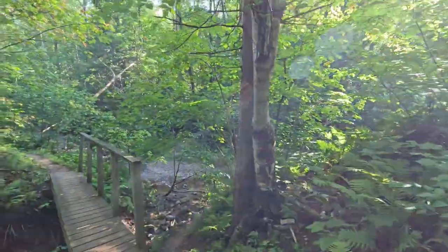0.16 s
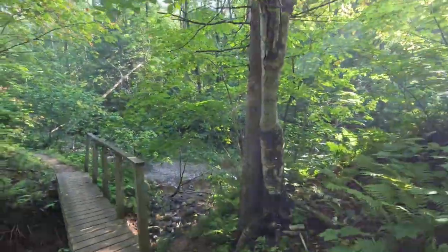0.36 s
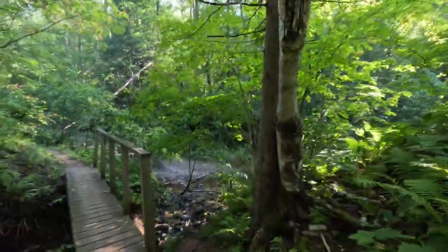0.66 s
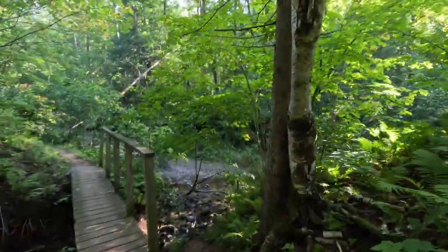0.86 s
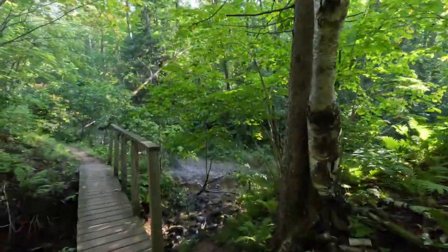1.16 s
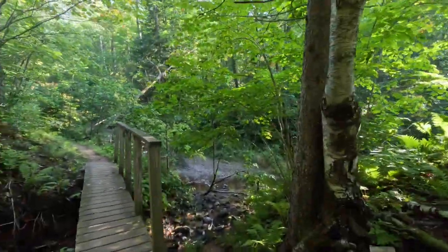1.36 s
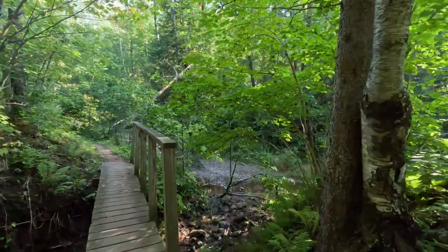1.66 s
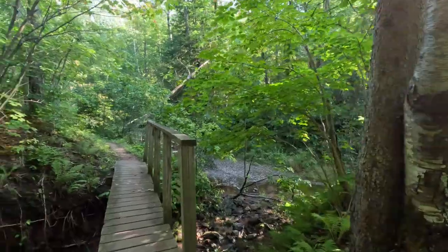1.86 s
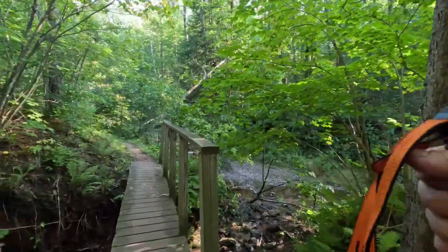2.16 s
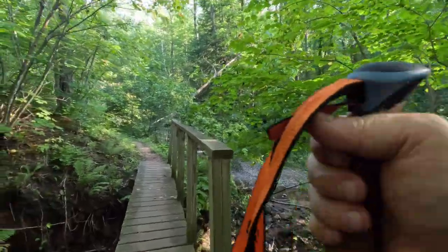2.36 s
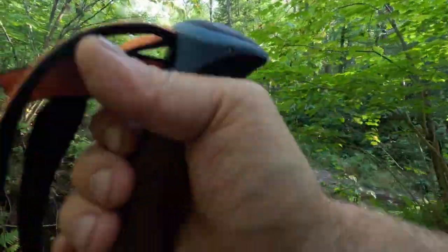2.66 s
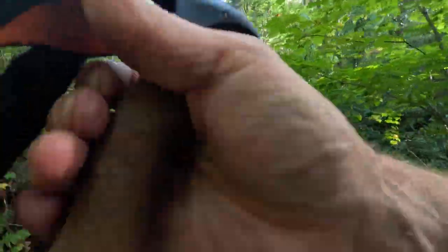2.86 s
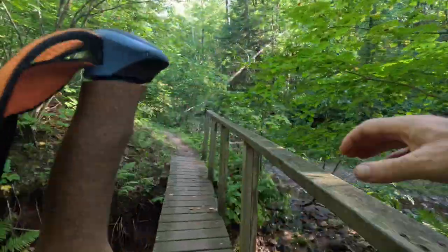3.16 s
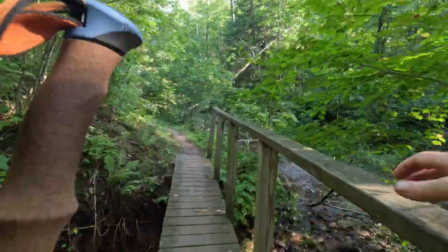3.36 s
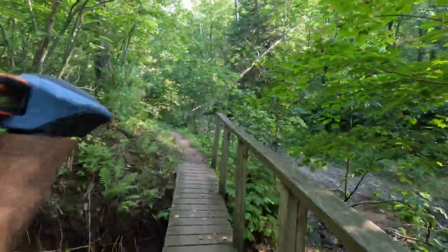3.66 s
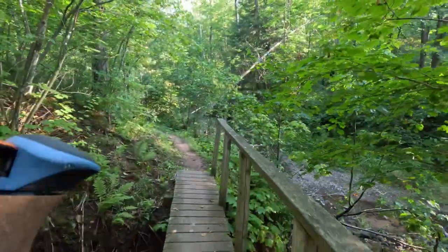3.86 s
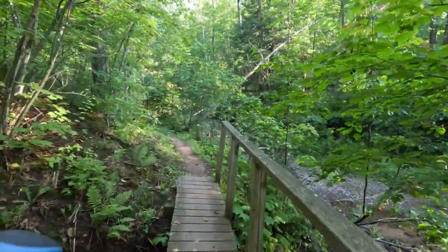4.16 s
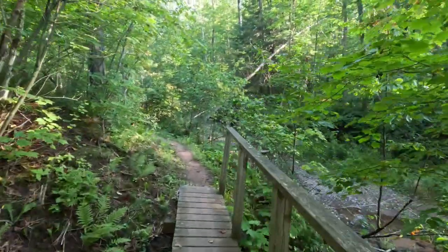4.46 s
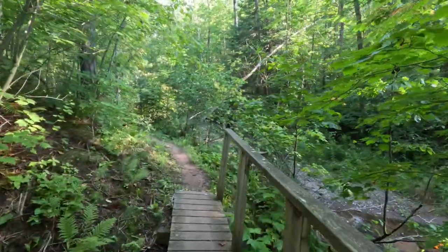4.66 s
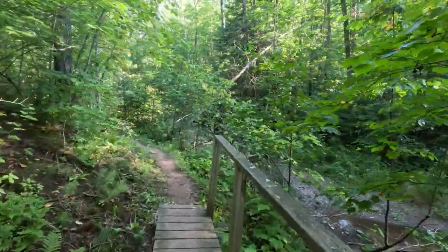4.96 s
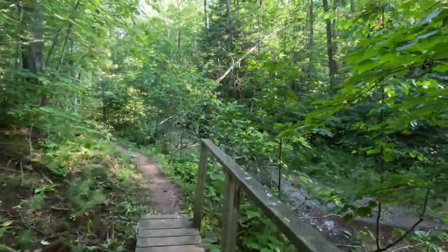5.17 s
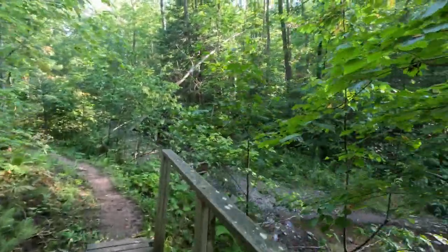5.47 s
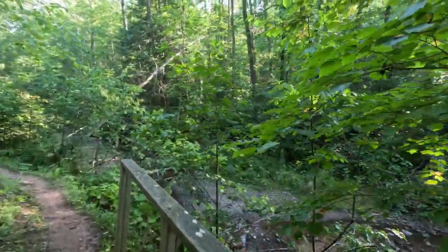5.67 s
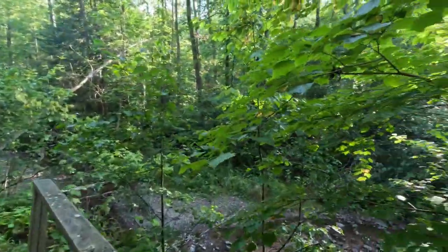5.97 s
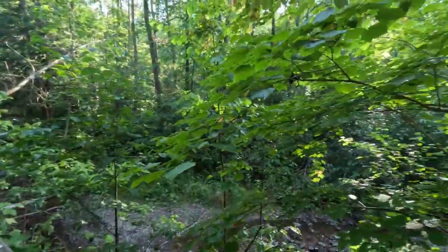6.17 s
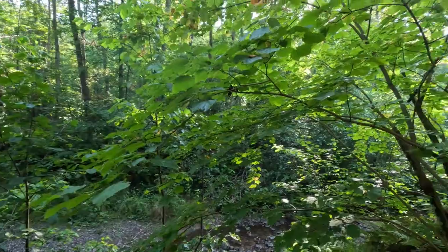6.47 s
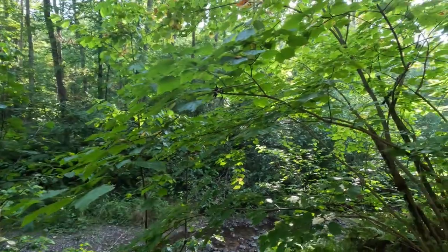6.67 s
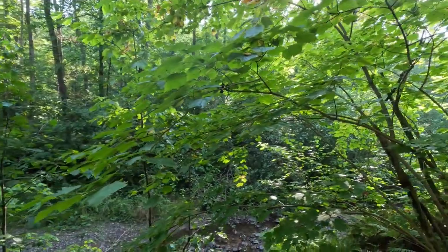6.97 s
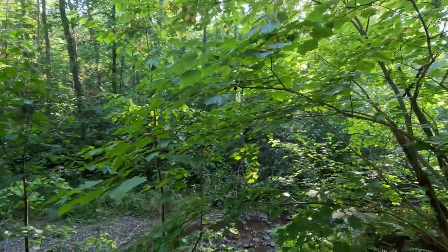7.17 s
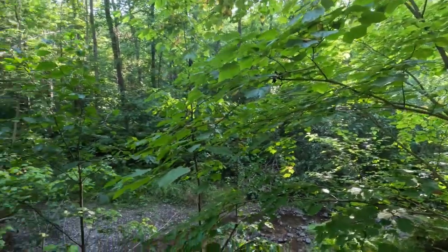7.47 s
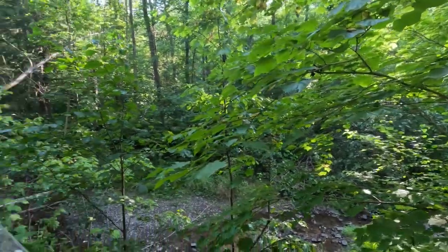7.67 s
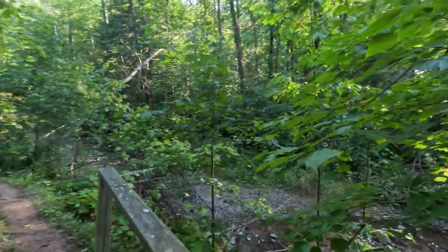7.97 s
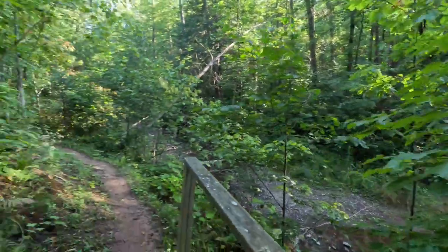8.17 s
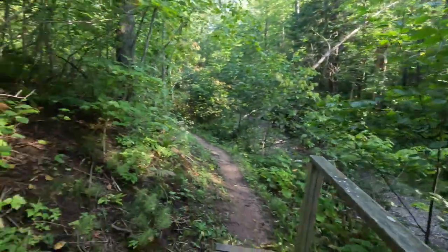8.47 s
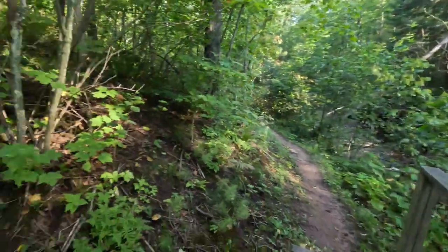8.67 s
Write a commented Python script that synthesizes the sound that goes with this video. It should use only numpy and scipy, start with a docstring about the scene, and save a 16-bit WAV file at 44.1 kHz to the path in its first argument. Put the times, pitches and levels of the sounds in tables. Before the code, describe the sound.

Heard from the walker's body, boots thud on a gritty path, then step onto a wooden footbridge with hollow booms and sharp pole knocks, loudest at about three and a half seconds. Clothes swish and low jolts accompany the steps. Later the footfalls thin out, leaving a small creek hissing and gurgling, with a few scrapes and last soft steps.

```python
"""Boots and trekking poles come down a forest path and over a wooden footbridge, heard from the walker's body.
Soft blows ring low modes for the thuds and booms; sharp ones ring plank modes for the knocks of heels and poles.
Uneven slips scrape over the wood, clumps of tiny snaps make grit crunch, and shaped noise makes clothes swish.
Footfalls and shifts of the body jolt the microphone with a low rumble. Behind it all a small creek hisses,
gurgles and sprays: shaped noise with small splashes, and many short, ringing bubbles."""
import sys
import numpy as np
from scipy import signal
from scipy.fft import rfft, irfft
from scipy.io import wavfile
from scipy.ndimage import uniform_filter1d

SR = 44100
rng = np.random.default_rng(int(sys.argv[2]) if len(sys.argv) > 2 else 0)


def transcribe(signal):
    """Save signal, clipped to [-1, 1], as a 16-bit WAV file at the path in sys.argv[1]."""
    frames = np.atleast_2d(signal).T
    limited = np.clip(frames, -1, 1)
    pcm = np.round(limited * 32767).astype(np.int16)
    wavfile.write(sys.argv[1], SR, pcm)


N = 389050
TIME = np.arange(N) / SR  # seconds


def amp(db):
    """Turns decibels into a gain."""
    return 10 ** (np.asarray(db) / 20)


def evened(x):
    """Scales a sound to an average (rms) level of 1."""
    return x / np.sqrt(np.mean(x ** 2) + 1e-20)


def unit_blow(x):
    """Scales a blow to the energy of 20 ms at rms 1."""
    return x / np.sqrt(np.sum(x ** 2) / (.02 * SR) + 1e-20)


def read(points, hz):
    """Reads a curve between its points, along a log-frequency axis."""
    point_hz, value = np.transpose(points)
    return np.interp(np.log(hz + 1), np.log(point_hz + 1), value)


def level(rows, axis=1):
    """Turns one dB column of a curve over time into a gain for every sample."""
    rows = np.array(rows)
    return amp(np.interp(TIME, rows[:, 0], rows[:, axis]))


def panned(x, db):
    """Places a sound between left and right; positive dB makes the left louder."""
    return amp([[db / 2], [-db / 2]]) * x


def add(mix, s, sound):
    """Mixes a sound in at time s, cut off at the end of the mix."""
    part = mix[:, max(round(s * SR), 0):][:, :sound.shape[-1]]
    part += sound[..., :part.shape[1]]


def band(x, lo_hz, hi_hz, order=3):
    """Keeps the frequencies between two limits."""
    limits = [lo_hz, min(hi_hz, .48 * SR)]
    return signal.sosfilt(signal.butter(order, limits, "band", fs=SR, output="sos"), x)


def ring(modes, t, stretch, uneven_db, detune):
    """Rings the dying modes of wood, each with a slightly random strength, pitch and sign."""
    hz, db, t60 = np.transpose(modes)[:, :, None]
    weight, shift, side = rng.standard_normal((3, len(modes), 1))
    fade = amp(db + uneven_db * weight - 60 * t / (t60 * stretch))
    return np.sign(side) * fade * np.sin(2 * np.pi * hz * (1 + detune * shift) * t)


def load_curve(s, hold_s, rise_s, fall_db_per_s):
    """Follows the load of one step or shift: it builds up to time s, holds, and dies away."""
    early = np.maximum(s - TIME, 0)
    late = np.maximum(TIME - s - hold_s, 0)
    return np.exp(-early / rise_s) * amp(-fall_db_per_s * late)


# The weight of a boot or pole coming down. Each row: start in seconds, level in dB,
# pitch of the spot that is hit in Hz, and a factor on the ring time.
WEIGHT_BLOWS = [(.024, -34.5, 174, 0.36), (.709, -33, 190, 0.1), (0.849, -47, 235, 0.74),
                (1.261, -34, 162, 1), (1.82, -34.5, 228, 0.64), (1.869, -43.5, 264, 0.37),
                (2.007, -49.5, 140, 1), (2.333, -28.5, 234, 0.81), (2.348, -24, 177.5, 1),
                (2.362, -30.5, 210, 0.72), (2.849, -47, 262, 0.84), (2.93, -29.5, 248, 1),
                (2.958, -37, 187, .45), (3.055, -46, 184, 0.077), (3.287, -41, 382, 0.92),
                (3.367, -31, 220, 0.64), (3.526, -19.5, 304, 0.83), (3.533, -20.5, 217, 0.66),
                (3.54, -30, 420, 0.85), (3.55, -39, 126, 1), (4.276, -44, 275, 0.61), (4.3, -39, 212, 1),
                (4.688, -45, 378, 0.63), (4.801, -42.5, 240, 1), (4.849, -35.5, 263, 1),
                (4.87, -31, 223, 0.9), (4.884, -32.5, 245, 0.94), (4.935, -42, 179, .45),
                (5.312, -42.5, 216, 1), (5.356, -37.5, 254, 1), (5.385, -37.5, 247, 1),
                (5.418, -43, 210, 1), (5.622, -42.5, 357, 0.98), (5.814, -43.5, 225, 1),
                (5.84, -33, 215, 1), (5.877, -44, 215, 1), (6.295, -45.5, 215, 1), (6.591, -51.5, 235, 1),
                (8.171, -46, 243, 1), (8.517, -40.5, 294, 0.56), (8.796, -36, 206, 0.96)]
# Low modes of the ground, tuned as a bridge deck. Each row: pitch in Hz, relative strength in dB,
# and seconds to fade by 60 dB before each sound stretches or shortens it.
LOW_MODES = [(141.6, -7.5, 0.6), (175, 2, 0.12), (206, 0, 0.021), (211, -1.5, 0.19), (237, -11.5, 0.2),
             (275.3, -9, 0.24), (320.3, -7, 0.12), (377, 1, 0.061), (536, 8.5, 0.037)]


def thumps():
    """A soft blow drives the spot under the boot; low modes near its pitch ring on, for path and deck alike."""
    out, t = np.zeros((2, N)), np.arange(SR // 3) / SR
    mode_hz, mode_db, mode_t60 = np.transpose(LOW_MODES)[:, :, None]
    for s, db, hz, stretch in WEIGHT_BLOWS:
        spot = np.sin(2 * np.pi * hz * t) * amp(-60 * t / (0.072 * stretch))
        near = np.exp(-(np.log2(mode_hz / hz) / 0.44) ** 2)  # distance in octaves
        fade = amp(mode_db - 60 * t / (mode_t60 * stretch))
        ground = (near * fade * np.sin(2 * np.pi * mode_hz * t)).sum(0)
        tread = band(rng.standard_normal(len(t)), hz * .72, hz * 1.7, order=2) * amp(-60 * t / .04)
        blow = unit_blow(spot) + amp(-4.5) * unit_blow(ground) + amp(-5.0) * unit_blow(tread)
        # the rubber sole spreads the push over a few milliseconds
        push = 1 - np.exp(-t / (0.0048 * stretch ** 2))
        blow = band(blow * push, hz * 0.3, hz * 4.3, order=2)
        add(out, s, -amp(db) * unit_blow(blow))
    return out


# Hard contacts of heel, toe and pole, and the click of a strap at 3.0078 s. Each row: start in seconds,
# level in dB, weight behind the blow in dB, hardness in dB, pitch of the spot in Hz,
# seconds for the rattle to fade by 60 dB, and left over right in dB.
HARD_CONTACTS = [(0.0241, -50, -7, -9, 1100, 0.017, 2), (0.0489, -35.5, -23, -7.5, 2270, 0.037, 7),
                 (.072, -47.5, -25, -3.5, 1390, .079, 6), (0.135, -53, -29, -6, 1830, 0.038, 9),
                 (.706, -42, -4, -9, 1040, 0.083, 4), (0.755, -53.5, -4, -17, 1480, 0.1, 6),
                 (1.263, -41, -11, -11, 1220, .052, 3), (1.321, -50.5, -14, -1, 1600, 0.24, 6),
                 (1.822, -47.5, -7, -9, 1220, 0.087, 3), (1.864, -50, -15, -2.5, 1240, .05, 3),
                 (1.894, -48, -15, -8, 1180, 0.18, 4), (2.3334, -37.5, 1, -17, 1620, 0.014, 2),
                 (2.354, -43, -7, -14, 990, 0.036, -1), (2.369, -36.5, -8, -16, 1940, 0.036, 2),
                 (2.8491, -40.5, -8, -1.5, 1350, 0.06, 0.5), (2.886, -49, -15, -1.5, 1530, 0.059, 2),
                 (3.0078, -50, -15, 5, 1670, 0.032, -2), (3.288, -31.5, -11, -7, 1330, 0.029, 2),
                 (3.3001, -33.5, -10, -15, 1300, 0.019, 1), (3.307, -30, -4.5, -14.5, 887, 0.08, 0.5),
                 (3.348, -37.5, -7, -26, 1090, 0.045, 1), (3.367, -22.5, -19, -4, 1460, 0.034, 4),
                 (3.4963, -32.5, -4, -19, 910, 0.073, -0.5), (3.5189, -26.5, -4, -18, 1190, 0.069, 2.5),
                 (3.538, -40, -21, -15, 1250, 0.088, 1), (3.611, -41.5, -3.5, -15, 880, 0.042, 0),
                 (3.667, -43, -4, -4, 1290, 0.02, 1), (3.717, -44.5, -3, -26, 1040, 0.15, 0),
                 (4.686, -34, -16.5, -7.5, 1220, 0.025, 2.5), (4.797, -54, -8, -5, 1820, 0.018, 4),
                 (4.8701, -39, -5, -20, 1140, 0.024, 3.5), (4.931, -46.5, -6, -21, 1450, 0.19, 4),
                 (5.312, -44, -12, -7, 1690, 0.14, 3), (5.383, -50.5, -12, -18, 1440, .03, 2),
                 (5.493, -51, -4, -18, 1710, .017, 4), (5.6213, -30.5, -20, -9.5, 1370, 0.044, 1),
                 (5.717, -73.5, -17, 16, 1390, 0.049, 1), (5.816, -48, -14, -8.5, 1460, 0.063, 3),
                 (5.842, -49, -21, -23, 1250, .028, 1), (5.89, -51.5, -15, -9, 1830, 0.044, -2),
                 (7.238, -47, -12, -18, 1600, 0.04, 7), (8.4998, -46.5, 2.5, -22, 1340, 0.063, 3.5),
                 (8.523, -48, -12, -19, 1640, .05, 11), (8.796, -40, -11, -9, 1304, 0.44, 3.5)]
# The ways a single plank bends. Each row: pitch in Hz, relative strength in dB,
# and seconds to fade by 60 dB before each sound stretches or shortens it.
PLANK_MODES = [(376, -25.5, .2), (494, -25, .031), (684, -19, .054), (940, 0, .06), (982, -11, .08),
               (1204, 2, .033), (1303, -8, .07), (1620, -4, .06), (1810, 2, .055), (1835, 1, .047),
               (2194, 17, .0083), (2630, -3, .05), (2880, 5, .035), (3350, 7, .03), (5040, 2, .02),
               (5940, 2, .023)]
TICK_DB, TICK_PER_HARDNESS = -6, 1.59  # the topmost tick grows faster with hardness than the edge below it


def knocks():
    """Each contact mixes a sharp crack, the clack of the struck spot, plank modes and a short rattle."""
    out, t = np.zeros((2, N)), np.arange(SR // 6) / SR
    for s, level_db, weight_db, hard_db, hz, t60, pan_db in HARD_CONTACTS:
        wood = unit_blow(ring(PLANK_MODES, t, t60 / .035, uneven_db=1.5, detune=.015).sum(0))
        spot = unit_blow(np.sin(2 * np.pi * hz * t) * amp(-60 * t / (0.32 * t60)))
        grain = rng.standard_normal((3, len(t)))
        grain = grain[0] + amp(-13.5) * grain[1:]  # nearly the same noise on both sides
        crack = unit_blow(grain * np.exp(-t / 0.00096))
        rattle = unit_blow(grain * amp(-60 * t / t60))
        blow = amp(-4) * wood + amp(-6) * spot + amp(2) * crack + amp(6) * rattle
        # the heavy, low motion builds up last
        rise_s = np.array([0.007, 0.00038, 0.000032, 0.000035])
        swells = 1 - np.exp(-t / rise_s[:, None])
        # weight drives the low knock, hardness the edge and tick above the spot's own range
        levels = [weight_db, 0, hard_db, TICK_DB + TICK_PER_HARDNESS * hard_db]
        ranges = [(370, 760), (hz * 0.66, hz * 1.35), (2300, 4000), (4900, 9200)]
        colour = 0
        for db, swell, (lo, hi) in zip(levels, swells, ranges):
            colour = colour + amp(db) * np.sqrt(2) * unit_blow(band(blow * swell, lo, hi))
        add(out, s, amp(level_db) * panned(colour, pan_db))
    return out


# Soles or poles dragged over wood. Each row: start in seconds, length in seconds, level setting in dB, centre
# pitch in Hz, and left over right in dB.
DRAGS = [(4.204, 0.046, -35, 2050, 4), (5.305, 0.023, -41.5, 2110, 5),
         (6.242, 0.085, -35.5, 1750, 5), (6.543, 0.11, -51.5, 1770, 5),
         (8.038, 0.1, -52, 1450, 3), (8.17, 0.035, -44, 1440, 4.5)]


def scrapes():
    """Quick uneven slips excite plank and deck modes; the sound darkens as the slide goes on."""
    out, t = np.zeros((2, N)), np.arange(SR // 5) / SR
    for s, length, db, hz, pan_db in DRAGS:
        u = np.clip(t / length, 0, 1)  # progress of the slide
        unevenness = uniform_filter1d(rng.standard_normal(len(t)), 100)
        turns = np.cumsum(260 * (1 + 3.5 * unevenness)) / SR  # about 260 slips per second
        grip = .25 + np.exp(-(turns % 1) / .25)
        slips = grip * rng.standard_normal(len(t)) * abs(np.sin(np.pi * u ** 0.83)) ** 0.99
        plank_ring = ring(PLANK_MODES, t, 0.93, uneven_db=-2, detune=0.023).sum(0)
        wood = signal.fftconvolve(slips, plank_ring)[:len(t)]
        deck_ring = ring(LOW_MODES, t, .6, uneven_db=1, detune=.01).sum(0)
        deck = signal.fftconvolve(slips * u, deck_ring)[:len(t)]
        rub = evened(slips) + amp(-12) * evened(wood)
        # fade from a brighter band to a darker one
        sound = (1 - u) * band(rub, hz * 0.69, hz * 1.46) + u * band(rub, hz * 0.42, hz * 1.18)
        sound = evened(sound) + amp(-23.5) * evened(band(deck, 170, 443))
        sound += amp(-18.5) * evened(band(slips, 3370, 6700, order=3))
        add(out, s, panned(amp(db) * sound * np.sqrt(length / t[-1]), pan_db))
    return out


# Grit crushed under a sole. Each row: time of full load in seconds, level in dB, hold in seconds.
CRUSHED_GRIT = [(0.07, -58, 0.036), (0.687, -54, 0.1), (1.27, -57, 0.17), (1.823, -55, 0.11),
                (2.358, -50.5, 0.027), (3.6, -55, 0.1), (5.897, -52.5, 0.057), (8.173, -52, 0.022),
                (8.499, -48.5, 0.042)]
CRUNCH_RISE_S, CRUNCH_FALL_DB_PER_S = 0.0057, 200
GRAINS_PER_S, GRAIN_SPREAD_DB = 350, 6.5


def crunches():
    """Grains of many sizes snap in a clump as the weight comes onto them."""
    size = amp(GRAIN_SPREAD_DB * np.minimum(rng.exponential(1, N), 3))
    grains = rng.standard_normal(N) * (rng.random(N) < GRAINS_PER_S / SR) * size
    t = np.arange(SR // 100) / SR
    snap = rng.standard_normal(len(t)) * np.exp(-t / .001)
    grit = evened(band(signal.oaconvolve(grains, snap)[:N], 600, 3300))
    load = sum(amp(db) * load_curve(s, hold, CRUNCH_RISE_S, CRUNCH_FALL_DB_PER_S)
               for s, db, hold in CRUSHED_GRIT)
    return panned(load * grit, 5.5)


# Footfalls and shifts of the body shake the microphone and load the ground. Each row: time of full load
# in seconds, jolt level in dB, jolt hold in seconds, roll level in dB, roll hold in seconds.
BODY_LOADS = [(0.048, -35.5, 0.044, -61, 0.039), (0.701, -34, 0.12, -56, 0.25),
              (1.29, -27.5, 0.038, -54, .08), (1.845, -42, 0.2, -56.5, 0.33),
              (2.335, -41.5, 0.17, -44, 0.075), (2.861, -39.5, 0.17, -47, 0.13),
              (3.526, -36.5, 0.095, -47, 0.077), (4.251, -48.5, 0.26, -46.5, 0.087),
              (4.457, -42, 0.022, -61, 0.026), (4.796, -44, 0.18, -46, 0.11),
              (5.309, -40.5, 0.097, -47.5, .11), (5.83, -47.5, 0.22, -51.5, 0.15),
              (6.254, -56, 0.096, -47.5, 0.022), (6.579, -68, 0.055, -52.5, .05),
              (8.06, -70, .1, -54.5, 0.18), (8.504, -61, .05, -50.5, 0.04), (8.783, -49, .05, -46, .05)]
# Unrest between these loads. Each row: time in seconds, body sway in dB, shifting weight in dB.
BODY_UNREST = [(0, -52.5, -56.5), (1.2, -57, -66), (2.6, -58.5, -70.5), (3.25, -45.5, -52.5),
               (4, -58.5, -64), (5.2, -56, -77.5), (6.8, -67, -67), (7.3, -56, -69), (7.8, -69, -69),
               (8.4, -52, -73), (8.82, -68, -70)]
ROLL_RISE_S, ROLL_FALL_DB_PER_S = 0.01, 133


def rolling():
    """Small uneven shifts of weight keep low modes murmuring during each footfall or shift of the body."""
    t = np.arange(SR // 4) / SR
    shifts = rng.standard_normal(N) * (rng.random(N) < 260 / SR)  # about 260 per second
    low_ring = ring(LOW_MODES, t, .5, uneven_db=1, detune=.01).sum(0)
    murmur = band(signal.oaconvolve(shifts, low_ring)[:N], 165, 370, order=2)
    load = sum(amp(db) * load_curve(s, hold, ROLL_RISE_S, ROLL_FALL_DB_PER_S)
               for s, _, _, db, hold in BODY_LOADS)
    return np.hypot(load, level(BODY_UNREST, axis=2)) * evened(murmur)


# How alike left and right are. Each row: frequency in Hz, likeness from 0 (unrelated) to 1 (the same).
LIKENESS = [(30, 0.82), (80, 1), (200, 0.1), (700, 0.75), (1400, 0.37), (3100, 0.47), (7000, 0.84),
            (15000, 0.14)]


def noise(spectrum):
    """Colours random noise, partly alike at the two microphones."""
    hz = np.fft.rfftfreq(N, 1 / SR)
    a, b = rfft(rng.standard_normal((2, N)))
    same = np.clip(read(LIKENESS, hz), 0, 1)
    mid, side = a * np.sqrt(1 + same), b * np.sqrt(1 - same)
    return evened(irfft(np.array([mid + side, mid - side]) * amp(read(spectrum, hz)), N))


# Strokes of clothes and straps. Each row: peak time in seconds, rise in seconds, fall in seconds,
# stroke level in dB before cloth and grit are balanced.
CLOTH_STROKES = [(.69, 0.078, 0.077, -54.5), (1.33, 0.052, 0.27, -59.5), (1.88, 0.028, 0.067, -60.5),
                 (2.36, 0.052, 0.028, -58), (2.5, 0.058, 0.048, -58), (2.955, 0.036, 0.032, -47),
                 (3.04, .04, 0.03, -43.5), (3.385, 0.017, 0.026, -44), (3.54, .05, 0.078, -57.5),
                 (3.72, 0.047, 0.033, -55.5), (5.358, 0.046, 0.063, -60), (5.9, 0.025, 0.16, -64),
                 (8.53, 0.019, 0.072, -65), (8.714, 0.0093, 0.011, -56)]
# Colour of rubbing cloth. Each row: frequency in Hz, relative strength in dB.
CLOTH_COLOUR = [(300, 16), (800, 3.5), (1300, 6), (2200, 5.5), (3100, 8), (5000, 2.5), (6700, 1),
                (10000, -8), (13000, -21), (15500, -31)]
# Grit underfoot: most on the path, least early on the deck, growing again towards the end.
# Each row: time in seconds, dB above the stroke level.
GRIT_SHARE = [(0, -5.5), (2, 3), (2.6, -12), (3.4, -12), (5.5, -4), (8.82, 5)]


def clothes():
    """Fabric rubs in strokes, while grit crunches under the sole."""
    stroke = sum(amp(db) * np.exp(-((TIME - s) / np.where(TIME < s, rise, fall)) ** 2)
                 for s, rise, fall, db in CLOTH_STROKES)
    crackle = amp(evened(uniform_filter1d(rng.standard_normal(N), 90)))  # quick 1 dB flutter
    grains = rng.standard_normal(N) * (rng.random(N) < 220 / SR)  # about 220 per second
    snap = rng.standard_normal(300) * np.exp(-np.arange(300) / SR / 0.0015)
    grit = evened(band(signal.oaconvolve(grains, snap)[:N], 680, 6500, order=4))
    fabric = amp(5.5) * evened(noise(CLOTH_COLOUR) * crackle)
    return stroke * (fabric + level(GRIT_SHARE) * grit)


# Colour of the low rumble. Each row: frequency in Hz, relative strength in dB.
RUMBLE_COLOUR = [(8, 0), (20, 6.5), (38, 1.5), (60, -10), (100, -19), (200, -50), (500, -87)]
JOLT_RISE_S, JOLT_FALL_DB_PER_S = 0.026, 168


def jolts():
    """The microphone sways with the body, and every step or shift shakes a rumble into it."""
    shake = sum(amp(db) * load_curve(s, hold, JOLT_RISE_S, JOLT_FALL_DB_PER_S)
                for s, db, hold, _, _ in BODY_LOADS)
    return np.hypot(shake, level(BODY_UNREST)) * noise(RUMBLE_COLOUR)


def bubble(hz, cycles, glide):
    """A bubble rings and dies away; its pitch rises with a positive glide and sinks with a negative one."""
    u = np.arange(int(6 * cycles / hz * SR)) / SR * hz / cycles  # time in units of the fading time
    swell = 1 - np.exp(-u / .25)
    return swell * np.exp(-u) * np.sin(2 * np.pi * cycles * (u + glide * u ** 2))


def bubbles(low_hz, high_hz, per_s, spread_db, cycles, scatter_s):
    """Each little spill of water traps a cluster of five bubbles of many sizes."""
    out = np.zeros((2, N))
    count = int(per_s * N / SR)
    spills = rng.random((count, 3))
    members = rng.random((count, 5, 5))
    for (when, force, side), cluster in zip(spills, members):
        for delay, size, loud, length, glide in cluster:
            hz = low_hz * (high_hz / low_hz) ** size
            db = spread_db * min(-np.log(1 - force), 2.5) + 9 * loud - 4 * size
            sound = amp(db) * bubble(hz, cycles * (.35 + length), .025 * (glide - .35))
            add(out, when * N / SR + scatter_s * delay, panned(sound, 16 * (side - .5)))
    return evened(out)


# Colour of the creek's hiss. Each row: frequency in Hz, relative strength in dB.
HISS_COLOUR = [(30, -42), (100, -16), (150, 1), (190, 7.5), (300, -9.5), (480, -2), (750, -6.5), (1100, 0),
               (1600, -0.5), (2500, -5), (4000, -9), (7000, -17), (10000, -26), (13000, -32), (15500, -40)]
# The creek as the bank opens. Each row: time in seconds, then the levels of hiss, gurgle and spray in dB,
# before the creek's echo and left-right balance.
CREEK_LEVELS = [(0, -57.5, -71, -62), (1.1, -60, -62.5, -63), (2.1, -58, -66, -63), (3, -57, -56.5, -58.5),
                (4, -56.5, -54.5, -63.5), (5, -57, -59, -61.5), (6, -56.5, -57, -61.5),
                (7, -64.5, -58.5, -57.5), (8, -63, -55, -59), (8.82, -56, -59, -60)]
# The largest bubbles. Each row: start in seconds, pitch in Hz, level setting in dB.
BIG_BUBBLES = [(.171, 1274, -40.5), (3.876, 1270, -38), (4.572, 1170, -43), (5.909, 942, -37),
               (6.038, 1254, -36.5), (6.174, 1090, -34.5), (6.208, 1390, -37), (6.7, 1830, -38),
               (7.12, 1580, -36), (7.454, 984, -39.5), (7.972, 1240, -30), (8.578, 1043, -44)]


def creek():
    """Hiss that comes in small splashes, gurgling bubbles, fine spray and a few big glugs."""
    spray = bubbles(2600, 11000, per_s=70, spread_db=3.4, cycles=7, scatter_s=.03)
    gurgle = bubbles(1030, 2600, per_s=55, spread_db=3.4, cycles=8.5, scatter_s=.03)
    spectra = signal.stft(noise(HISS_COLOUR), nperseg=512)[2]
    # splashes lift patches about a kilohertz wide and a few hundredths of a second long
    patches = uniform_filter1d(rng.standard_normal(spectra.shape[1:]), size=12, axis=0)
    patches = uniform_filter1d(patches, size=5, axis=1)
    splashes = amp(2.2 * evened(patches))
    hiss = evened(signal.istft(spectra * splashes, nperseg=512)[1][:, :N])
    # the finest spray merges into a bright fizz
    spray = evened(spray + evened(band(hiss, 4000, 13000, order=1)))
    water = level(CREEK_LEVELS) * hiss
    water += level(CREEK_LEVELS, axis=2) * gurgle
    water += level(CREEK_LEVELS, axis=3) * spray
    for s, hz, db in BIG_BUBBLES:
        add(water, s, amp(db) * bubble(hz, cycles=10.4, glide=0.0075))
    return panned(water + amp(-13) * forest(water), 2)


# How long echoes last. Each row: frequency in Hz, seconds to fade by 60 dB.
ECHO_FADE = [(100, 0.89), (300, 0.65), (1000, 0.53), (3000, 0.33), (10000, 1)]


def forest(x):
    """Thin echoes from the banks and trunks: scattered random reflections, nearly alike on both sides."""
    taps = rng.standard_normal((2, SR // 2)) * (rng.random((2, SR // 2)) < 2000 / SR)
    hz, t, spectra = signal.stft(taps, SR, nperseg=256)
    fade = amp(-60 * t / read(ECHO_FADE, hz)[:, None])
    build_up = 1 - np.exp(-t / 0.0075)
    tail = signal.istft(spectra * fade * build_up, SR, nperseg=256)[1]
    tail = tail + 0.97 * tail[::-1]  # blend left and right
    return signal.fftconvolve(x, tail / np.linalg.norm(tail[0]), axes=1)[:, :N]


def scene():
    """The walker close by, the creek below."""
    steps = thumps() + knocks() + scrapes() + crunches()
    echoes = amp(-19) * forest(steps)
    return steps + echoes + rolling() + clothes() + jolts() + creek()


EDGE_HZ = 15700


def record(dry):
    """Cuts off the highest treble with a steep low-pass filter."""
    lowpass = signal.firwin(511, EDGE_HZ, window=("kaiser", 9), fs=SR)
    return signal.oaconvolve(dry, lowpass[None], "same")


dry = scene()
out = record(dry)
transcribe(out)
```